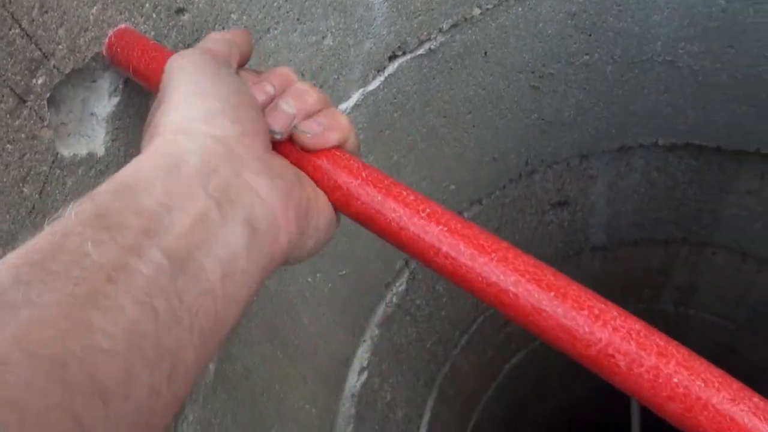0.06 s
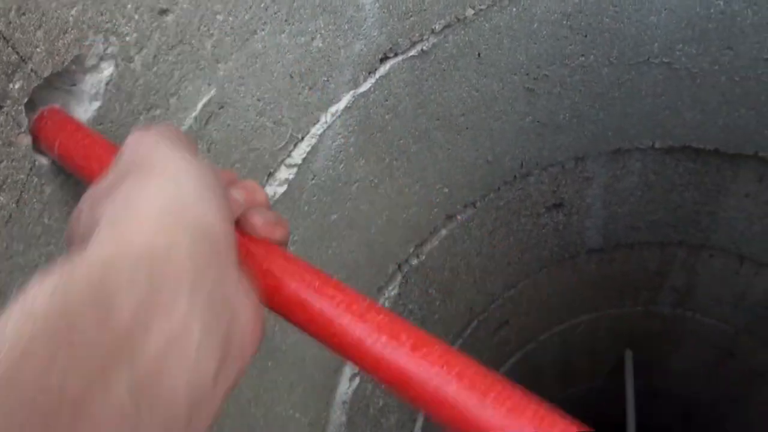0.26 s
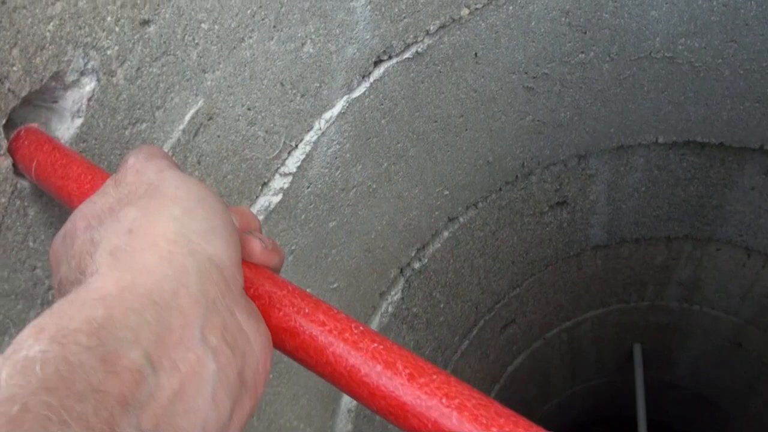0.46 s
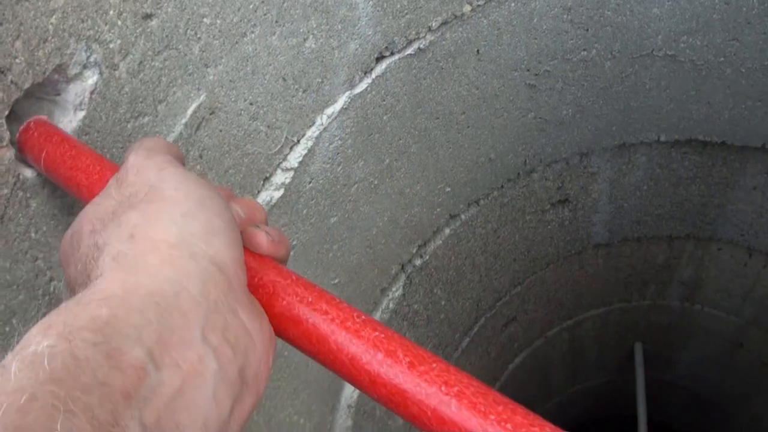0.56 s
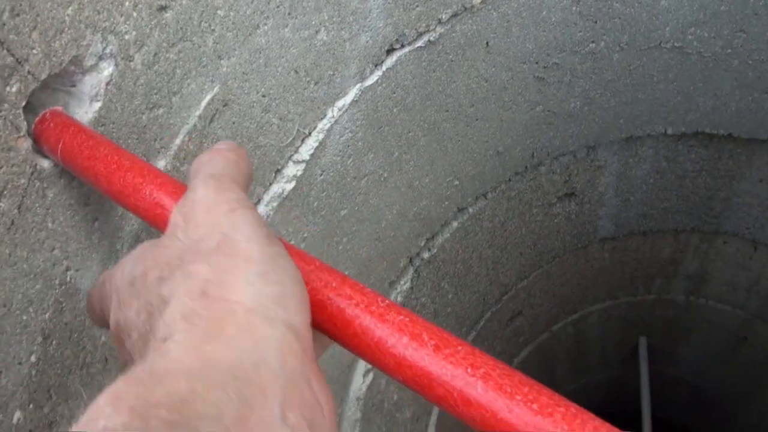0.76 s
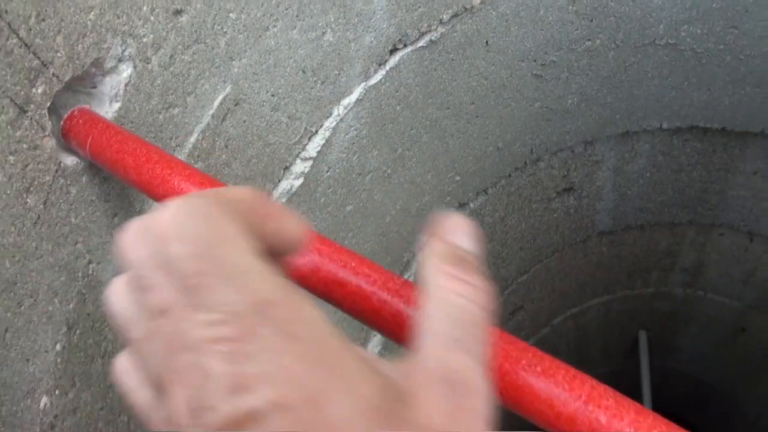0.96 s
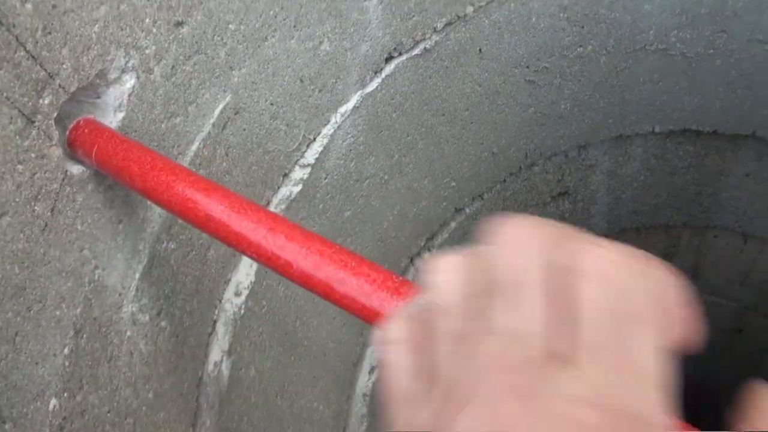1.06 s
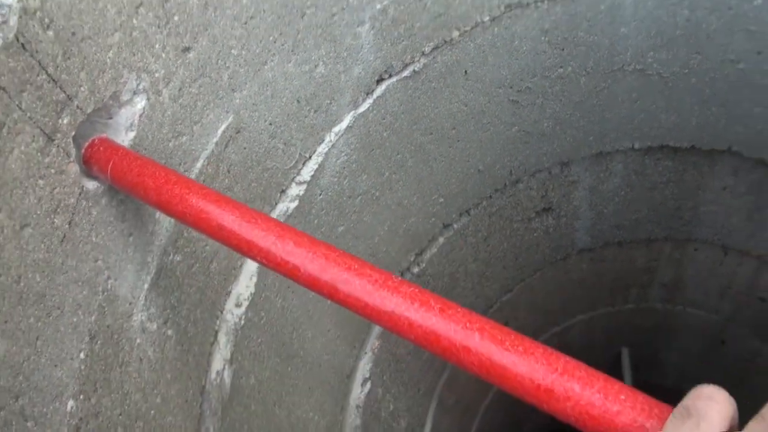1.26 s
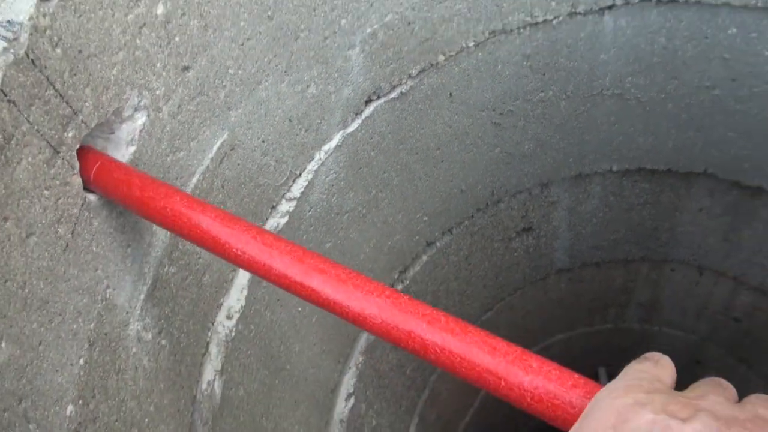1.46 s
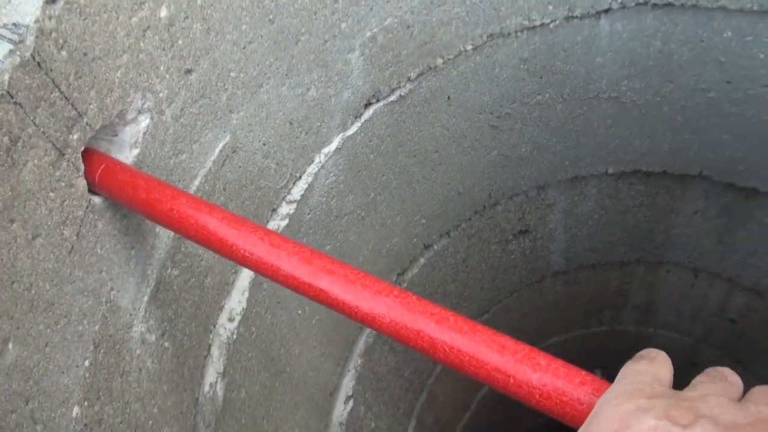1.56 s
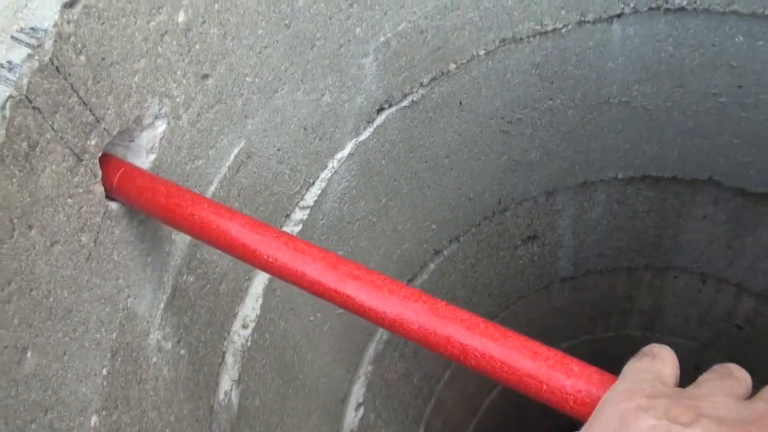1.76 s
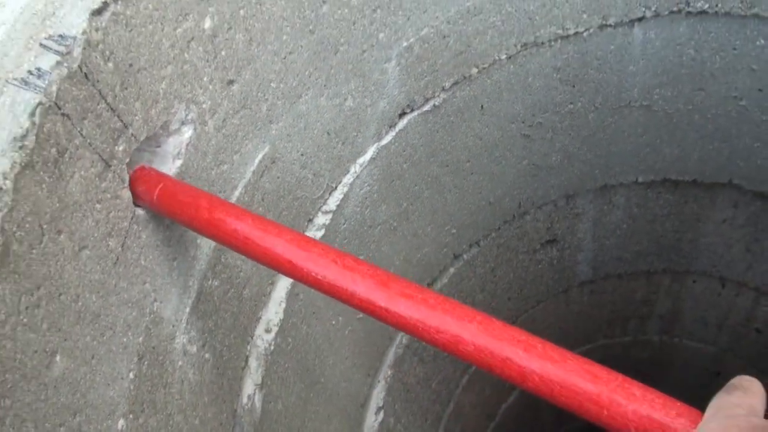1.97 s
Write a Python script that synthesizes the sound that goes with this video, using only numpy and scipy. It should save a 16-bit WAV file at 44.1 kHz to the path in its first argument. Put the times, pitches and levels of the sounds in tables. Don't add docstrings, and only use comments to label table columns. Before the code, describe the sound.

Wooden pole grates over gritty concrete, knocks hard and jams, its clacks ringing down a deep shaft

```python
import sys
import numpy as np
from scipy import signal
from scipy.fft import rfft, irfft
from scipy.io import wavfile
from scipy.ndimage import uniform_filter1d

SR = 44100
rng = np.random.default_rng(int(sys.argv[2]) if len(sys.argv) > 2 else 0)


def dump(signal):
    limited = np.clip(np.atleast_2d(signal).T, -1, 1)
    pcm = np.round(limited * 32767).astype(np.int16)
    wavfile.write(sys.argv[1], SR, pcm)


def linear_from_db(decibels):
    return 10 ** (np.asarray(decibels, float) / 20)


N = 88200
T = np.arange(N) / SR

# (frequency [Hz], density [dB per Hz])
GRIT_SPECTRUM = [(180, -68), (300, -14), (634, -10), (888, -11.5), (2340, -4), (10000, -47.5), (13000, -69),
                 (22000, -120)]
FREE_KNOCK_WET_DB = 2


def evened(x):
    return x / np.sqrt(np.mean(x ** 2) + 1e-20)


def read(points, hz):
    f, value = np.transpose(points)
    return np.interp(np.log(hz + 1), np.log(f + 1), value)


def curve(points):
    s, db = np.transpose(points)
    return linear_from_db(np.interp(T, s, db, -120, -120))


def resonate(x, hz, width_hz):
    r = np.exp(-np.pi * max(width_hz, 1) / SR)
    return 2 * signal.lfilter([1 - r], [1, -r * np.exp(2j * np.pi * hz / SR)], x).real


def ring_body(x, modes):
    return sum((-1) ** k * linear_from_db(db) * resonate(x, hz, width_hz) for k, (hz, width_hz, db) in enumerate(modes))


def colour(x, points):
    log_gain = np.log(linear_from_db(read(points, abs(np.fft.fftfreq(4096, 1 / SR)))))
    taps = np.fft.ifft(np.exp(np.conj(signal.hilbert(log_gain)))).real[:2048]
    return signal.oaconvolve(x, taps)[:N]


def ports(a, b, same, lr_db, turn):
    same = np.clip(same, 0, 1)
    left = (same * a + np.sqrt(1 - same ** 2) * b) * np.exp(1j * turn)
    return np.array([left * linear_from_db(lr_db / 2), a * linear_from_db(-lr_db / 2)])


def field(spectrum, same, lr_db, patchy_db):
    hz = np.fft.rfftfreq(1024, 1 / SR)[:, None]
    a, b, c, d, patch = rng.standard_normal((N // 256 + 5, 513, 5)).T
    patch = uniform_filter1d(patch, size=10, axis=0)
    patch = evened(uniform_filter1d(patch, size=8, axis=1))
    z = ports(a + 1j * b, c + 1j * d, read(same, hz), read(lr_db, hz), 0)
    z = z * linear_from_db(read(spectrum, hz) + patchy_db * patch)
    out = signal.istft(z, nperseg=1024, noverlap=768)[1][:, :N]
    return out / np.std(out.mean(0))


def air():
    # (frequency [Hz], density [dB per Hz])
    air_spectrum = [(120, -15), (200, -13), (320, -4), (376, -12.5), (708, -5), (880, -8), (4310, -5),
                    (12300, -33.5), (15000, -37.5)]
    # (time [s], level [dB])
    air_level = [(0, 2.5), (.7, -1), (1.4, 0), (2.0, 3)]
    # (frequency [Hz], likeness [0-1])
    air_same = [(200, 0.73), (1000, 0.38), (6000, 0.084)]
    # (frequency [Hz], balance [dB])
    air_lr = [(60, -8), (130, -37), (290, -14), (630, -10), (1380, -10), (3030, -8), (6650, 6),
              (14600, -7.5)]
    return linear_from_db(-39) * curve(air_level) * field(air_spectrum, air_same, air_lr, patchy_db=2.0)


def wind():
    # (time [s], level [dB])
    gusts = [(0, -47), (.1, -49.5), (.33, -52.5), (.4, -42.5), (.6, -53), (.84, -44.5), (.89, -35),
             (.94, -41.5), (1.03, -32), (1.11, -54), (1.15, -37), (1.24, -37), (1.3, -41), (1.46, -47),
             (1.55, -31.5), (1.7, -48.5), (2.0, -53)]
    # (frequency [Hz], density [dB per Hz])
    wind_spectrum = [(20, -5.5), (50, -2.5), (120, -5), (250, -11.5), (600, -20.5), (1500, -50.5)]
    # (frequency [Hz], likeness [0-1])
    wind_same = [(25, .92), (60, .6), (150, .45)]
    # (frequency [Hz], balance [dB])
    wind_lr = [(25, -13), (60, -10), (150, -7)]
    return curve(gusts) * field(wind_spectrum, wind_same, wind_lr, patchy_db=1.5)


def grit_grains():
    grains_per_s, grain_db, clump_db = 6000, 2.5, 2.5
    clump = evened(uniform_filter1d(rng.standard_normal(N), size=130))
    grains = (rng.random(N) < grains_per_s / SR) * rng.choice([-1., 1.], N)
    size = np.minimum(rng.exponential(1, N), 4)
    return evened(grains * linear_from_db(grain_db * size + clump_db * clump))


def handle():
    # (time [s], level [dB])
    strokes = [
        [(.122, -34), (.132, -25), (.147, -30), (.151, -19), (.17, -19.5), (.19, -22), (.2, -33), (.21, -45)],
        [(.31, -40), (.345, -27), (.358, -24), (.369, -15), (.378, -34), (.385, -27), (.392, -10), (.401, -32)],
        [(.402, -25), (.44, -19.5), (.47, -28), (.5, -38)],
        [(.945, -23.5), (.962, -30), (.968, -25.5), (1.0, -25), (1.04, -51.5)],
        [(1.466, -27), (1.474, -28), (1.482, -15), (1.49, -30), (1.497, -21), (1.519, -19), (1.524, -29.5),
         (1.56, -40)],
        [(1.572, -56), (1.582, -29), (1.592, -38), (1.6, -20.5), (1.64, -48.5)],
        [(1.686, -28), (1.7, -36), (1.73, -55)],
        [(.6395, -37), (.655, -40), (.658, -32), (.7, -42), (.717, -45), (.722, -37), (.732, -50)],
    ]
    # (frequency [Hz], width [Hz], level [dB])
    slide = [(1780, 170, -3), (3050, 170, 4), (3800, 110, -8), (5300, 200, -12)]
    enter = [(700, 300, -9), (1750, 450, -6), (3100, 190, 2), (3800, 200, -9), (5400, 400, -11)]
    seat = [(1276, 17, 3.5), (1984, 47, 0), (2214, 44, -14.5), (2350, 24, -0.5), (2520, 15, -25),
            (2893, 35, -25)]
    push = [(1020, 36, 5), (1100, 80, 0), (1540, 37, 5), (1710, 40, 3), (1850, 40, 3), (2240, 36, 5),
            (2350, 30, 3), (2970, 60, 3), (3052, 30, 6), (3835, 34, 6.5), (4670, 50, -10)]
    twist = [(1058, 30, 11), (1180, 40, 9), (1440, 40, 3), (1670, 110, 7), (1930, 50, 4), (2270, 60, 9),
             (2380, 55, 12), (3040, 40, 11), (3740, 75, -2), (4540, 110, -7)]
    settle = [(781, 41, 16), (1176, 102, 15.5), (1910, 250, 5), (2390, 81, -29), (3100, 330, 7.5)]
    rasp_db = [-2.5, -22, 7.5, 5.5, 4.5, 3.5, 6, -2.5]
    stroke_wet_db = [-11, -9, -4.5, -2, -2.5, -2.5, -5, 1.5]
    # (frequency [Hz], density [dB per Hz])
    fine_spectrum = [(240, -36), (400, -17.5), (1770, -13.5), (2610, -10), (3070, -4.5), (14000, -26)]

    grains = grit_grains()
    fine, coarse = evened(colour(grains, fine_spectrum)), evened(colour(grains, GRIT_SPECTRUM))
    bodies = (slide, enter, seat, push, twist, settle, settle, settle)
    rasps = (fine, fine) + (coarse,) * 6
    cracks, blows = knocks()
    dry, sent = cracks, linear_from_db(FREE_KNOCK_WET_DB) * cracks
    for points, body, rasp, broad_db, wet_db in zip(strokes, bodies, rasps, rasp_db, stroke_wet_db):
        press = curve(points)
        during = (T >= points[0][0]) & (T < points[-1][0])
        ring = ring_body(grains * press + blows * during, body) / np.std(ring_body(grains, body))
        sound = ring + linear_from_db(broad_db) * rasp * press
        dry = dry + sound
        sent = sent + linear_from_db(wet_db) * (sound + cracks * during) - linear_from_db(FREE_KNOCK_WET_DB) * cracks * during
    return dry, sent


def knocks():
    # (time [s], peak [dB], colour [Hz], crack decay [s], handle ring [dB])
    blow_list = [(.1505, -19, 3000, .02, -8), (.1705, -19, 3000, .008, -15), (.191, -18, 3000, .01, -12),
                 (.3425, -22, 3200, .02, -10), (.3865, -20, 700, .03, -20), (.3905, -9, 2600, .01, -10),
                 (.403, -5, 2300, .02, -6), (.4057, -4, 2400, .012, -12), (.4395, -11, 2300, .03, -8),
                 (.6399, -2.5, 1750, .016, -30), (.64, -9, 3200, .018, -30), (.6435, -16, 2800, .02, -30),
                 (.6572, -17, 2200, .04, -30), (.7195, -20, 850, .045, -30), (.9463, -9, 1050, .03, -12),
                 (.96, -15, 1500, .008, -30), (.9652, -9, 1800, .03, -5), (.9925, -12, 2000, .008, -30),
                 (1.001, -13, 2200, .015, -18), (1.467, -19, 2900, .025, -12), (1.477, -12, 1150, .04, -12),
                 (1.481, -11, 2380, .04, -4), (1.4933, -6, 850, .035, -10), (1.5255, -2.5, 1800, .016, -21),
                 (1.546, -15, 2300, .02, -20), (1.581, -15, 1200, .025, -20),
                 (1.5955, -8.5, 2000, .03, -14), (1.607, -16, 1300, .02, -30),
                 (1.6862, -6.5, 1500, .013, -30)]
    crack_hz = [420, 650, 900, 1150, 1450, 1750, 2050, 2400, 2800, 3150, 3500, 3900, 4800]
    crack_oct, tick_db = 0.75, -12
    dent_s = 1e-4

    out, blows, t = np.zeros(N), np.zeros(N), T[:3000]
    tick = colour(np.eye(1, N)[0], GRIT_SPECTRUM)[:3000]
    for s, db, hz, crack_s, ring_db in blow_list:
        crack = np.zeros(len(t))
        for f, detune in zip(crack_hz, rng.uniform(.96, 1.04, len(crack_hz))):
            mode_gain = linear_from_db(-6 * (np.log2(f / hz) / crack_oct) ** 2)
            crack -= mode_gain * np.cos(2 * np.pi * f * detune * (t - dent_s))
        crack *= linear_from_db(-60 * t / max(crack_s, .004)) * np.minimum(t / dent_s, 1)
        start = round(s * SR)
        out[start:start + 3000] += linear_from_db(db) * (crack / abs(crack).max() + linear_from_db(tick_db) * tick / abs(tick).max())
        blows[start] += linear_from_db(db + ring_db + 30.0)
    return out, uniform_filter1d(uniform_filter1d(blows, size=3), size=4)


def shaft(x):
    # (frequency [Hz], t60 [s])
    shaft_t60 = [(300, 0.49), (1000, 0.21), (2500, 0.29), (5000, 0.12), (10000, 0.32)]
    gap_s, swell_s, shaft_db = .0165, 0.0003, -2
    taps = np.zeros(SR // 2)
    at = np.arange(0, SR // 2 - 16, 16)
    taps[at + rng.integers(0, 16, len(at))] = rng.choice([-1., 1.], len(at))
    hz, t, z = signal.stft(taps, SR, nperseg=256)
    decay = linear_from_db(-60 * t / read(shaft_t60, hz)[:, None])
    tail = signal.istft(z * decay, SR, nperseg=256)[1]
    tail *= np.minimum(T[:len(tail)] / swell_s, 1)
    tail = np.r_[np.zeros(round(gap_s * SR)), tail / np.linalg.norm(tail)]
    return linear_from_db(shaft_db) * signal.fftconvolve(x, tail)[:N]


def hum():
    # (time [s], level [dB], rise [s], t60 [s])
    swells = [
        (.43, -23, 0.031, 0.15),
        (.52, -40.5, .015, 0.37),
        (.15, -38.5, 0.0033, 0.093),
        (.675, -43.5, .02, 0.04),
        (1.52, -31, 0.018, 0.25),
        (1.59, -33, 0.014, 0.12),
        (1.635, -37, 0.014, 0.2),
    ]
    # (frequency [Hz], level [dB])
    hum_partials = [(634, 9), (651, 0), (612, -4)]
    out = np.zeros(N)
    for s, db, rise_s, t60 in swells:
        u = np.maximum(T - s, 0)
        rise = np.sin(np.pi / 2 * np.minimum(u / rise_s, 1)) ** 2
        shape = rise * linear_from_db(db - 60 * np.maximum(u - rise_s, 0) / t60)
        out += shape * sum(linear_from_db(d) * np.sin(2 * np.pi * (f * u + rng.random())) for f, d in hum_partials)
    return out


def near_sound():
    # (frequency [Hz], likeness [0-1])
    near_same = [(600, 0.55), (1500, 0.73), (4000, 0.88), (9000, 0.86)]
    # (frequency [Hz], balance [dB])
    near_lr = [(300, -3), (630, -15.5), (1400, -8.5), (3500, -11), (4500, -3.5), (6000, 14), (8500, 14),
               (11000, -8)]
    # (frequency [Hz], gain [dB])
    mic_response = [(150, -11), (400, -1), (7000, 0.5), (10000, -6), (14000, -13)]
    lag_s, lag_to_hz = 4.5e-5, 7500

    (dry_handle, sent), note = handle(), hum()
    one = dry_handle + shaft(sent) + note
    other = shaft(sent) + shaft(sent) + note
    hz = np.fft.rfftfreq(N, 1 / SR)
    turn = -2 * np.pi * hz * lag_s / (1 + (hz / lag_to_hz) ** 4)
    z = ports(rfft(one), rfft(other), read(near_same, hz), read(near_lr, hz), turn)
    return irfft(z * linear_from_db(read(mic_response, hz) - 3), N)


def drone():
    # (time [s], level [dB])
    drone_level = [(1.86, -71), (1.905, -38.5), (2.0, -47.5)]
    drone_hz = 321
    tone = np.sin(2 * np.pi * drone_hz * T) + 0.36 * np.sin(4 * np.pi * drone_hz * T)
    return curve(drone_level) * tone * linear_from_db(np.array([[-5], [3]]))


def scene():
    return air() + wind() + near_sound() + drone()


def gain_control(x):
    duck_from_db, duck, recover_db_per_s, ceiling = -15, 0.15, 27, 1.2
    power_db = 10 * np.log10(abs(uniform_filter1d((x ** 2).mean(0), size=400)) + 1e-12)
    fall = T * recover_db_per_s
    held_db = np.maximum.accumulate(power_db + fall) - fall
    over_db = np.maximum(held_db - duck_from_db, 0)
    ducked = x / linear_from_db(duck * uniform_filter1d(over_db, size=200))
    return ceiling * np.tanh(ducked / ceiling)


def dull(x):
    # (start [s], end [s], low edge [Hz], high edge [Hz])
    dulled = [
        (.41, .49, 10200, 16000),
        (.955, .995, 10200, 16000),
        (1.47, 1.56, 10300, 11300),
        (.635, .67, 10300, 11500),
    ]
    left_edge_hz, right_edge_hz = 11000, 15100
    hz = np.fft.rfftfreq(N, 1 / SR)
    z = rfft(x) * (hz < np.array([[left_edge_hz], [right_edge_hz]]))
    out = irfft(z, N)
    for start_s, end_s, lo_hz, hi_hz in dulled:
        during = uniform_filter1d(1. * (T > start_s) * (T < end_s), size=500)
        out = out - irfft(z * (hz > lo_hz) * (hz < hi_hz), N) * during
    return out


def gate(x):
    gate_db, gate_from_hz = 1, 8500
    hz, _, z = signal.stft(x, SR, nperseg=2048)
    size = uniform_filter1d(abs(z), size=8, axis=1)
    margin_db = gate_db - 6 + 8 * np.log2(np.maximum(hz, 1) / gate_from_hz)
    floor = np.median(size, axis=2, keepdims=True) * linear_from_db(margin_db)[:, None]
    keep = (size > floor) | (hz < gate_from_hz)[:, None]
    return signal.istft(z * keep, SR, nperseg=2048)[1][:, :N]


def top_cut(x):
    return signal.sosfilt(signal.butter(12, 15180, fs=SR, output="sos"), x)


def record(dry):
    return top_cut(gate(dull(gain_control(dry))))


dry = scene()
out = record(dry)
dump(out)
```